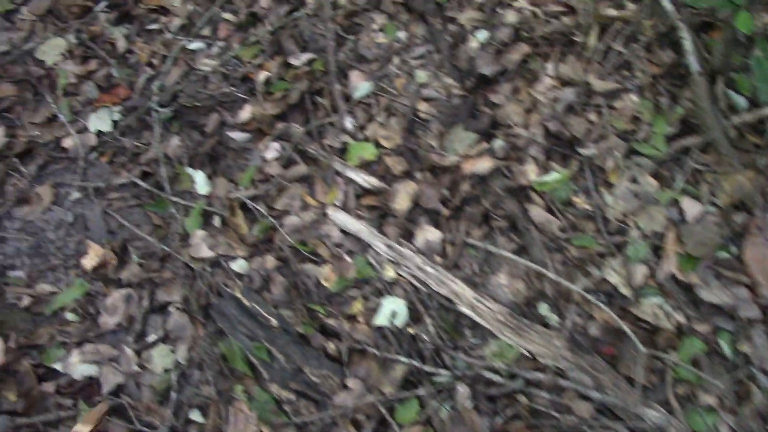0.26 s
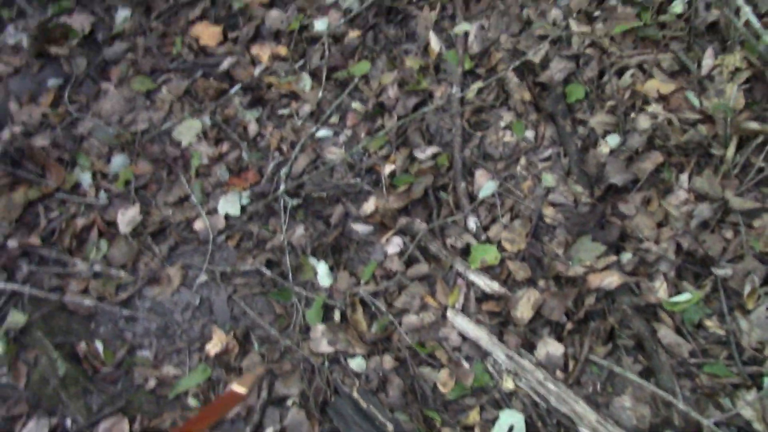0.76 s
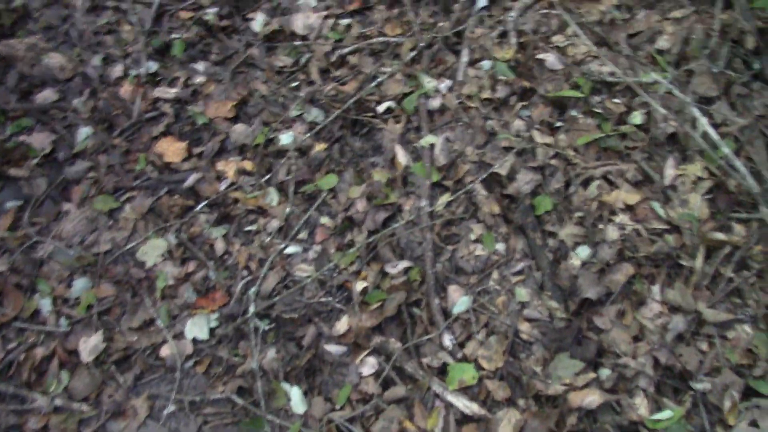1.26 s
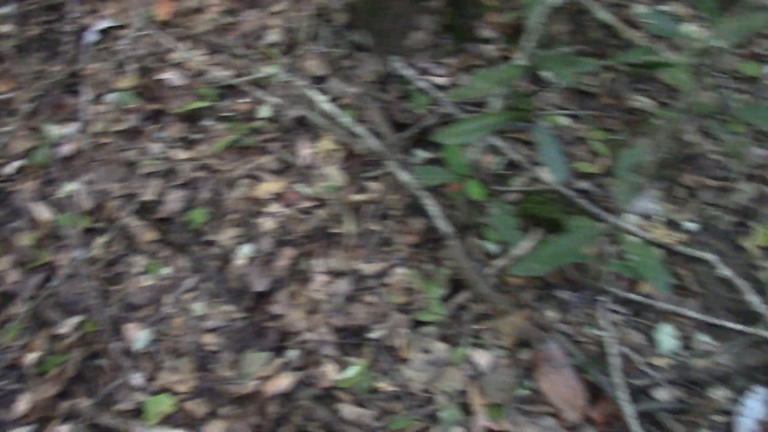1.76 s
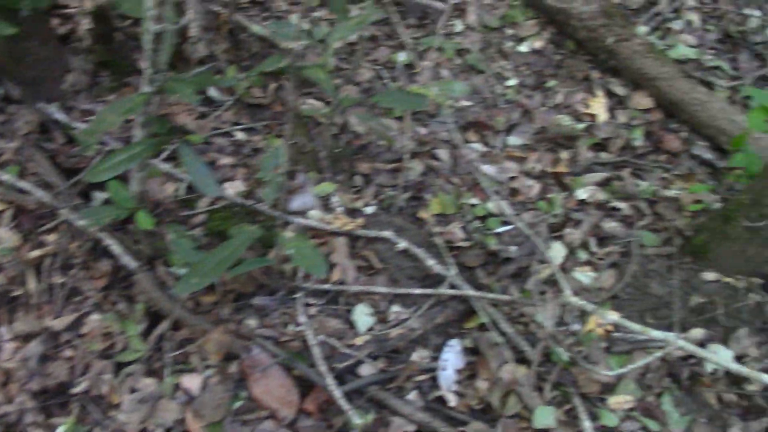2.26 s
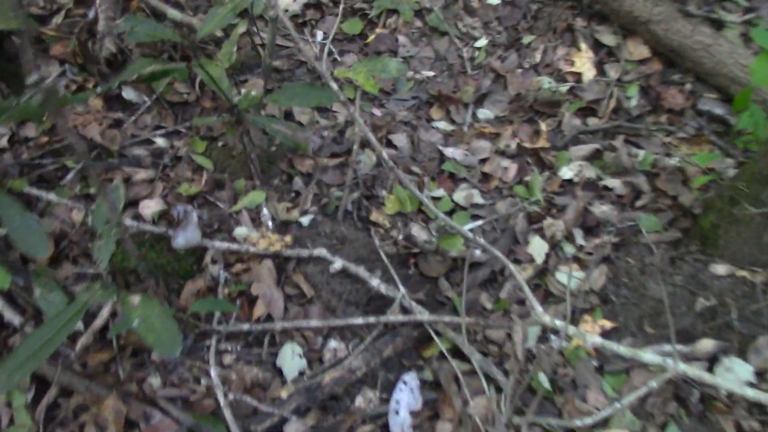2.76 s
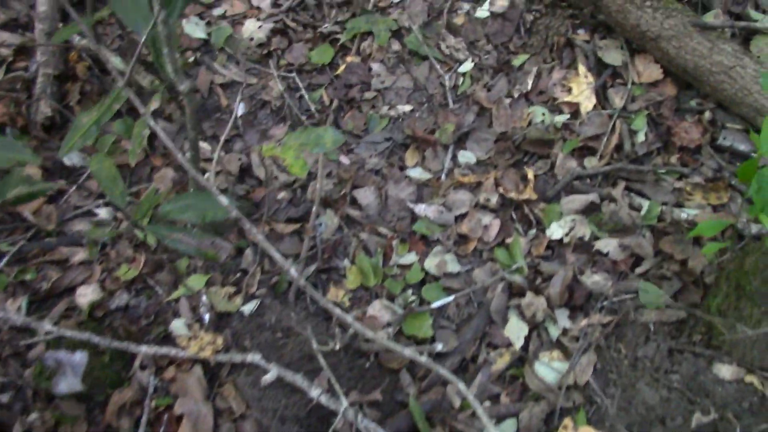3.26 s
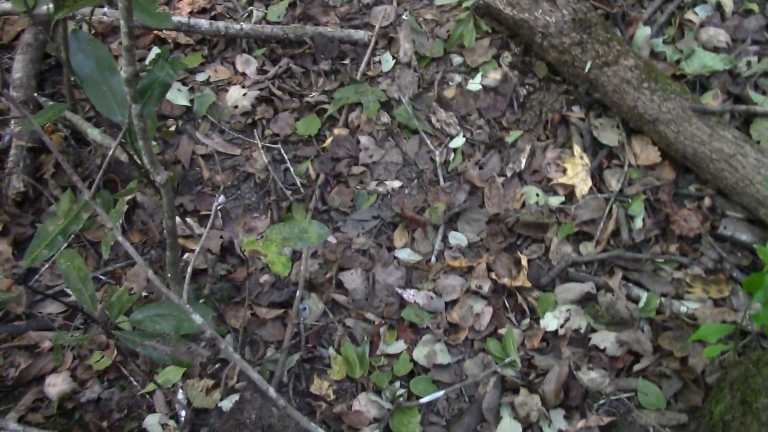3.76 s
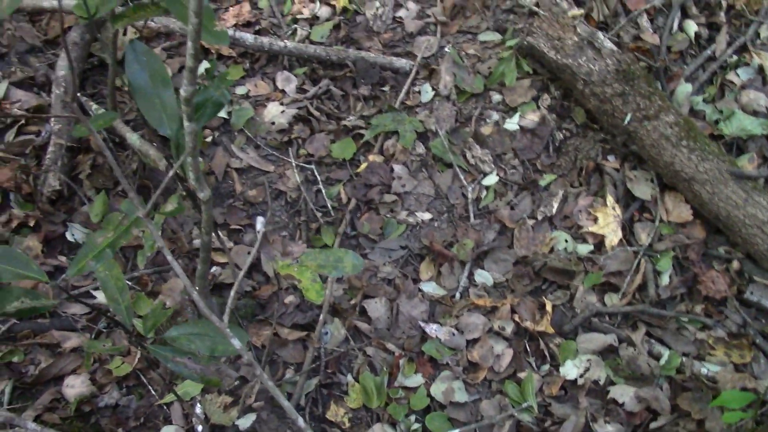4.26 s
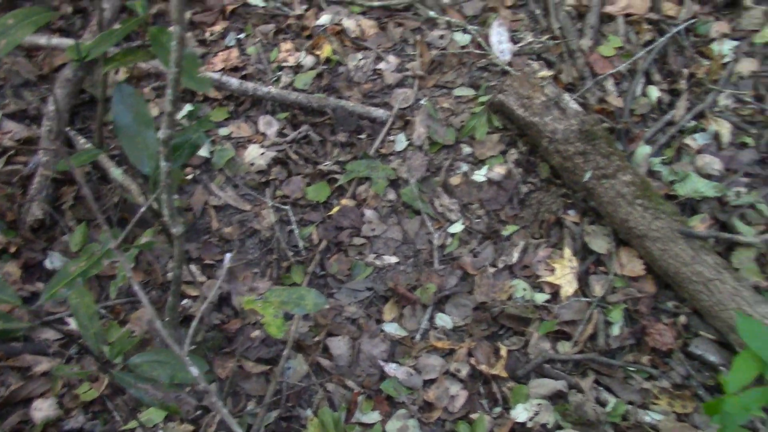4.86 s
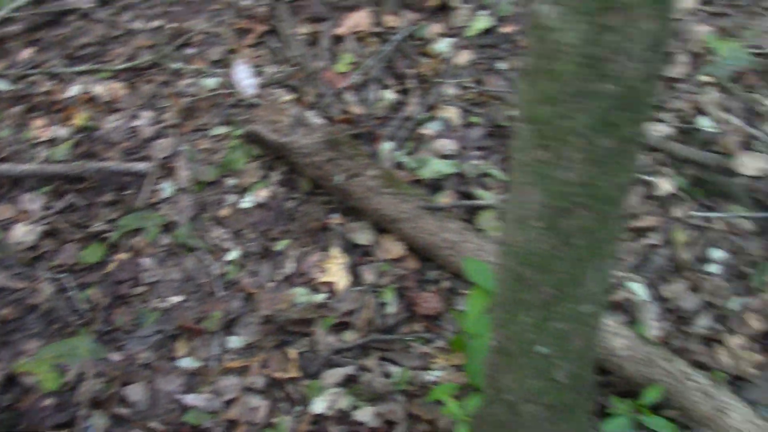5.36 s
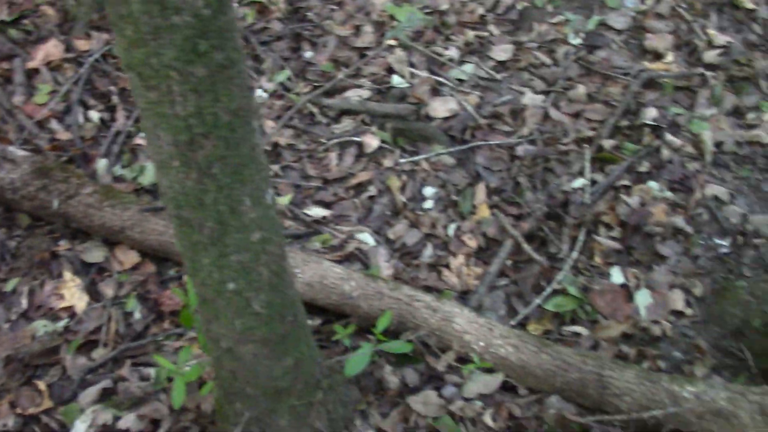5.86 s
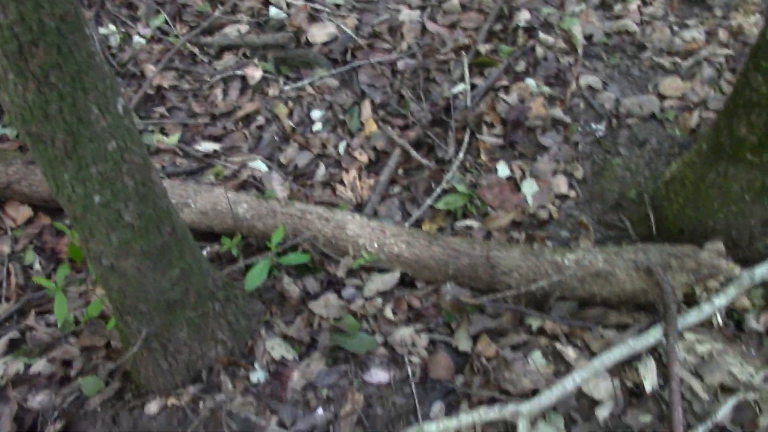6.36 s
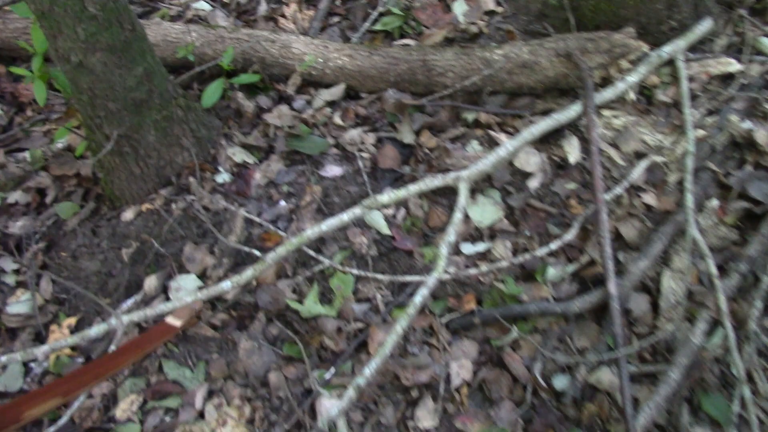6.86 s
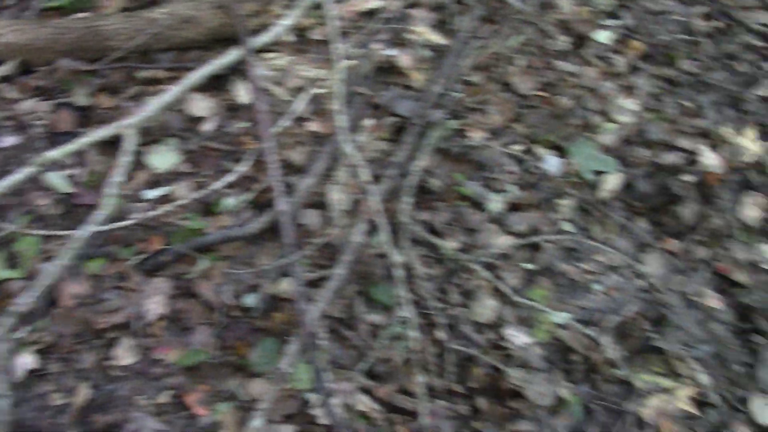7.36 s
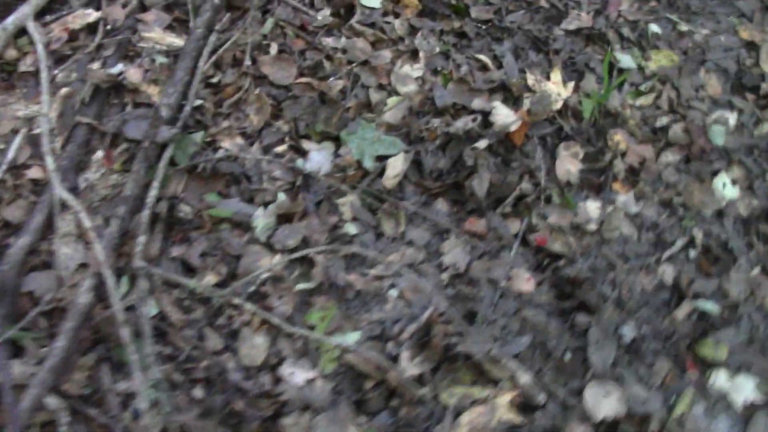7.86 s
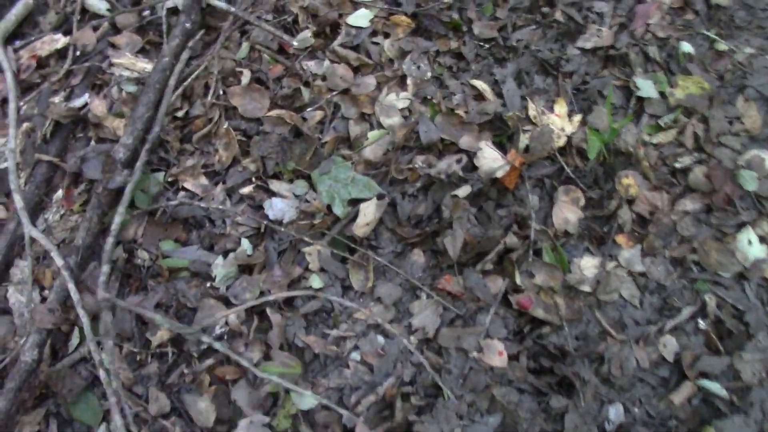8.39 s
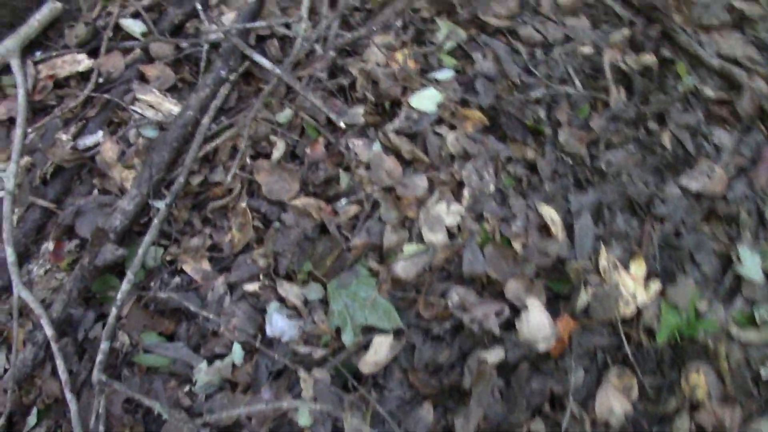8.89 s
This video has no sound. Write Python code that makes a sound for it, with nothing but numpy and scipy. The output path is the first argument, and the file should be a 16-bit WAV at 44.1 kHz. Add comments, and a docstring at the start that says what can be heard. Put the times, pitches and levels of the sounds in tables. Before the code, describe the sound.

In a quiet wood, feet press and drag through brittle leaves right beside the microphone, with sharp twig cracks and short woody knocks. The movement comes in uneven bursts, then nearly ceases for two seconds while a far bird whistles and a nearer one chips twice. Rustling and crunching return, building to denser crackles before easing as the far bird whistles again.

```python
"""Someone walks slowly through dry leaf litter in a quiet, faintly hushing wood, heard from close by.
For about four seconds each step crumples brittle leaves (bursts of tiny breaks), presses the layer below
and snaps twigs (short noise bursts) or knocks buried sticks (damped tones). Then the feet almost rest:
a far bird whistles (wavering tones) and a nearer one chips twice (two gliding voices), 1.7 s apart.
The steps return, and near the end the far bird whistles again."""
import sys
import numpy as np
from scipy import signal
from scipy.fft import rfft, irfft, next_fast_len
from scipy.io import wavfile
from scipy.ndimage import uniform_filter1d, minimum_filter1d, map_coordinates

SR = 44100
rng = np.random.default_rng(int(sys.argv[2]) if len(sys.argv) > 2 else 0)


def transcribe(u):
    """Save the signal u as a 16-bit wav file named by the first command-line argument.

    u: samples, shape (n,) or (channels, n), limited to [-1, 1]; the rate is SR.
    q: integer samples, one column per channel.
    """
    v = np.clip(np.atleast_2d(u).T, -1, 1)
    q = np.round(v * 32767).astype(np.int16)
    wavfile.write(sys.argv[1], SR, q)


N = 402633  # length in samples, about 9.1 s


def amp(db):
    """Decibels to gain."""
    return 10 ** (np.asarray(db) / 20)


def unit(x):
    """Scale x to an rms of 1."""
    return x / np.sqrt(np.mean(x ** 2) + 1e-20)


def along(points, hz):
    """Read a curve of (frequency, value) points on a log frequency axis."""
    f, v = np.transpose(points)
    return np.interp(np.log(hz + 1), np.log(f + 1), v)


def wobble(rate):
    """A smooth random curve through `rate` random values a second."""
    knots = rng.standard_normal(int(N * rate / SR) + 4)
    return map_coordinates(knots, [np.arange(N) * rate / SR])


def add(track, s, sound):
    """Lay a sound into a track at time s, cut off at the track's end."""
    start = max(round(s * SR), 0)
    room = track[..., start:start + sound.shape[-1]]
    room += sound[..., :room.shape[-1]]


def filtered(x, response):
    """Weight the spectrum of x by a response of frequency."""
    m = next_fast_len(N + SR // 4)
    gain = response(np.fft.rfftfreq(m, 1 / SR))
    return irfft(rfft(x, m) * gain, m)[..., :N]


def spread(pair, alike):
    """Mix two unrelated signals into a left and right that are as alike as asked at each frequency."""
    def turn(hz):
        return np.arccos(np.clip(along(alike, hz), -1, 1)) / 2
    mid, side = filtered(pair, lambda hz: np.array([np.cos(turn(hz)), np.sin(turn(hz))]))
    return np.array([mid + side, mid - side])


# Tone of the still woodland air: (frequency [Hz], relative level per Hz [dB])
AIR_COLOUR = [(25, -11), (90, -15), (220, -9.5), (450, -0.5), (700, -2), (1000, -2.5), (1330, -0.5),
              (1800, -4.5), (4500, -7.5), (6200, -18.5), (8500, -17.5), (15000, -31.5)]


def air():
    """The faint hush of the wood: coloured noise whose level drifts slowly."""
    hush = unit(filtered(rng.standard_normal((2, N)), lambda hz: amp(along(AIR_COLOUR, hz))))
    level_db = -59.5 + 0.54 * wobble(1.8)
    return amp(level_db) * hush


# The far bird's whistles: (time [s], length [s], pitch [Hz], level before the mix [dB])
FAR_WHISTLES = [(4.107, 0.056, 3220, -59), (4.164, 0.057, 3320, -62.5), (4.22, 0.089, 2320, -70),
                (8.87, 0.037, 3230, -52), (8.988, 0.069, 3250, -61)]


def whistles():
    """A far bird's thin whistles: pure tones that waver in pitch, swell and fade."""
    out = np.zeros(N)
    for s, length, hz, db in FAR_WHISTLES:
        t = np.arange(int(length * SR)) / SR
        pitch_hz = hz + 65 * wobble(167)[:len(t)]
        phase = 2 * np.pi * np.cumsum(pitch_hz) / SR
        swell = np.sqrt(np.abs(np.sin(np.pi * t / length)))
        add(out, s, amp(db) * swell * np.sin(phase))
    return out


# The near bird's chips: (time [s], level before the mix [dB])
NEAR_CHIPS = [(4.372, -45.5), (6.088, -42.5)]
# The upper voice within one chip: (time from its start [s], pitch [Hz], level relative to the chip [dB])
CHIP_SHAPE = [(0, 5400, -13), (.005, 5660, -6), (.011, 6560, -11), (.017, 7250, -8), (.028, 7570, -11),
              (.038, 7450, -10), (.048, 6570, -13)]


def chips():
    """A near bird's buzzy chips: two voices with jittery pitch, the upper rising and then dropping."""
    out = np.zeros(N)
    when, pitch, level_db = np.transpose(CHIP_SHAPE)
    t = np.arange(int(when[-1] * SR)) / SR
    for s, db in NEAR_CHIPS:
        upper_hz = np.interp(t, when, pitch) + 200 * wobble(528)[:len(t)]
        lower_hz = np.interp(t, when[[0, -1]], [5400, 6600]) + 280 * wobble(450)[:len(t)]
        upper = amp(np.interp(t, when, level_db)) * np.sin(2 * np.pi * np.cumsum(upper_hz) / SR)
        lower = 0.36 * np.sin(np.pi * t / t[-1]) * np.sin(2 * np.pi * np.cumsum(lower_hz) / SR)
        add(out, s, amp(db) * (upper + lower))
    return out


# How long the wood rings: (frequency [Hz], time to fall by 60 dB [s])
WOOD_RING = [(200, 0.39), (3000, 1), (7500, 0.65), (14000, 0.14)]


def among_trees(x):
    """Trunks and crowns scatter a sound into a stereo tail: noise that fades at its own rate per pitch."""
    hz, t, z = signal.stft(rng.standard_normal((2, SR * 3 // 4)), SR, nperseg=256)
    fade = amp(-60 * t / along(WOOD_RING, hz)[:, None])
    tail = signal.istft(z * fade, SR, nperseg=256)[1]
    return signal.fftconvolve(x[None], tail / np.linalg.norm(tail[0]), axes=1)[:, :N]


# Buried sticks and roots that knock under the sole:
# (time [s], level before a 5 dB trim [dB], pitch [Hz], time to fall by 60 dB [s])
BURIED_KNOCKS = [(.316, -26, 263, 0.017), (.352, -23, 1120, 0.018), (1.596, -7, 1390, 0.016),
                 (1.671, -23, 700, 0.018), (2.489, -25, 443, 0.043), (2.551, -23, 440, .035),
                 (2.691, -15, 967, 0.016), (2.809, -17.5, 715, 0.015), (2.874, -10.5, 875, 0.019),
                 (3.334, -26, 800, 0.028), (3.425, -34, 267, .035), (3.754, -25, 1160, 0.017),
                 (4.079, -47, 450, 0.035), (6.332, -31.5, 547, 0.027), (6.352, -33, 366, 0.044),
                 (6.371, -31, 343, 0.027), (6.496, -40, 407, 0.024), (6.668, -34, 480, 0.041),
                 (7.014, -35, 500, 0.037), (7.044, -33, 460, 0.044), (7.081, -18.5, 573, 0.037),
                 (7.16, -34, 490, 0.048), (7.459, -20.5, 1110, 0.014), (7.991, -33.5, 360, 0.11),
                 (7.994, -24, 610, 0.022), (8.388, -29.5, 403, 0.033), (8.419, -25, 840, .03),
                 (8.439, -30, 563, 0.047)]


def knocks():
    """A stick bedded in soil rings in a loose cluster of quickly damped tones."""
    out, t = np.zeros(N), np.arange(SR // 10) / SR
    for s, db, hz, t60 in BURIED_KNOCKS:
        # pitch and fading time vary a little around these multiples of the main tone
        ratios = np.array([[1], [.74], [1.33], [1.9]]) * np.exp(0.032 * rng.standard_normal((4, 1)))
        signs = rng.choice([-1, 1], (4, 1))
        modes = amp([[0], [-6], [-5], [-11]]) * signs * np.sin(2 * np.pi * hz * ratios * t)
        ring = np.sum(modes * amp(-60 * t * np.sqrt(ratios) / t60), axis=0)
        onset = 1 - np.exp(-t / 0.00059)
        add(out, s, amp(db - 5.0) * ring * onset)
    # so small a body radiates no bass
    return signal.sosfilt(signal.butter(3, 230, "high", fs=SR, output="sos"), out)


# Tone of breaking litter: (frequency [Hz], relative level per Hz [dB])
LITTER_COLOUR = [(120, -38), (230, -24), (430, -9.5), (750, -3.5), (1500, -3.5), (2500, 0.5), (4500, -3),
                 (5500, 4), (7000, 1.5), (8100, -5.5), (10100, -5.5), (11500, -13.5), (14200, -14.5),
                 (16500, -34.5)]


def litter_ring(low_hz, high_hz, size=1024, order=5):
    """The litter's short ring to one click, between two frequencies, starting at once; energy 1."""
    hz = np.fft.rfftfreq(size, 1 / SR) + 1
    low_cut = 1 + (low_hz / hz) ** (2 * order)
    high_cut = 1 + (hz / high_hz) ** (2 * order)
    gain = amp(along(LITTER_COLOUR, hz)) / np.sqrt(low_cut * high_cut)
    # folding the cepstrum (spectrum of the log spectrum) forward gives minimum phase
    cepstrum = irfft(np.log(np.maximum(gain, 1e-4)))
    cepstrum[1:size // 2] *= 2
    cepstrum[size // 2 + 1:] = 0
    ring = irfft(np.exp(rfft(cepstrum)))[:size // 2]
    return ring / np.linalg.norm(ring)


# Twigs that break; thin ones are bright and stout ones dull, a clean break is focused, a splintering one not:
# (time [s], level [dB], brightness [dB per octave], focus on the mid-range [dB], decay setting [s])
TWIG_SNAPS = [(.0308, -21.5, -0.5, -7.5, 0.0076), (.0483, -25.5, -2.5, -3.5, 0.015),
              (.144, -24.5, 3, 1, .0035), (.153, -22.5, 1.5, -5, 0.0025), (.2512, -25.5, 0, -4, 0.0084),
              (.3026, -21.5, 0, -9, 0.0038), (.3151, -8.5, 1, 4, 0.0031), (.436, -34, -1, 14, .005),
              (.5645, -29.5, 2.5, -7, 0.0041), (.655, -42.5, -10.5, 4, 0.004),
              (.7229, -36, -7.5, 16, 0.0034), (.9025, -20, 6, -2, 0.014), (.9306, -17.5, -4.5, 14, 0.0043),
              (1.143, -29, -5.5, 7, 0.0023), (1.249, -29.5, 0.5, 0, 0.0045),
              (1.2775, -24.5, -2.5, 13, .003), (1.435, -33.5, 2, -1, 0.0055), (1.4913, -29, 0, 6, .02),
              (1.5407, -21, 3, 1, 0.02), (1.5966, -14, 1.5, -10.5, 0.0037), (1.67, -16, 0.5, -5.5, 0.02),
              (1.6794, -21.5, 0.5, -9.5, 0.015), (1.7136, -15, 0.5, -0.5, 0.0096),
              (1.7805, -19.5, 1.6, -4, 0.011), (1.9242, -32.5, -1, -4, .0025),
              (1.9592, -37, 6.5, -5, .0066), (2.1458, -28.5, -3.5, 14, 0.0019),
              (2.2107, -35, -18.5, 37, 0.0019), (2.4839, -19, 0.5, -5, 0.051),
              (2.4983, -21, 1.5, -2, 0.015), (2.524, -24, 10, 0, 0.011), (2.5462, -3.5, 3, 2, 0.014),
              (2.6644, -24, -1.5, -0.5, .013), (2.6931, -21, -3.5, 5, .015), (2.7604, -22.5, 1, -7, 0.031),
              (2.8074, -10, 1.5, -1, 0.015), (2.8729, -1.5, 2.5, 7, 0.022), (2.9245, -26, 2, -10, .008),
              (3.2613, -20.5, 5, 9, 0.0073), (3.4181, -11, 0, -4, 0.007), (3.4242, -10, 3.5, -2.5, 0.0025),
              (3.4499, -16, 2.5, 1, 0.012), (3.755, -38.5, -5.5, -2, 0.021),
              (4.0713, -35.5, -9.5, 16.5, 0.089), (4.2184, -39, -1, -3.5, 0.037),
              (4.3257, -62.5, 10, -16, .004), (4.8428, -48, 4.5, -4, 0.0053),
              (5.5949, -48, 5.5, -0.5, 0.0092), (5.7633, -46.5, -9, 4.5, 0.015),
              (5.8801, -38.5, -1, 8, 0.022), (6.1745, -41.5, -2, 4, .007), (6.6689, -27.5, -2, 1, 0.009),
              (6.7932, -32.5, -11.5, 15, 0.011), (7.0991, -18.5, -1, 0, 0.019),
              (7.2324, -40, -1, 13, 0.022), (7.3948, -29.5, 1.5, 3, 0.057), (7.422, -36, 0, 6, 0.033),
              (7.5452, -14.5, 2.5, -2.5, 0.023), (7.729, -22, -4, -3.5, 0.028),
              (7.809, -22, -1, -7.5, .011), (7.8459, -21, -2.5, 0, .005), (7.8858, -21, -6.5, 5, .015),
              (8.0948, -14.5, 1.5, 3, 0.0045), (8.1433, -29, -6.5, 8.5, 0.0059),
              (8.2063, -25, -0.5, 4, .004), (8.226, -16, 2, 3, .02), (8.231, -18.5, 0.5, 8, .018),
              (8.267, -20, -0.5, -3, 0.0036), (8.2806, -20, 9.5, 10, 0.0099), (8.3864, -14, 1, -4, 0.0023),
              (8.407, -18, 3, -2, 0.018), (8.6485, -14.5, 1.5, -7, 0.011), (8.787, -25.5, 1, -10, 0.016),
              (8.9075, -24.5, 5, -2, 0.0022), (9.0849, -32, 0.5, 3, 0.018)]
# Share of a snap in its knock, crack, snap and splinter bands: (centre [Hz], level [dB])
SNAP_BANDS = [(900, -9.5), (2800, -4), (5900, -2), (11000, -6.5)]
SNAP_PIVOT_HZ = 4000  # brightness tilts the bands around this
SNAP_VARIES_DB = 0.13  # random level, band to band and twig to twig


def snaps(breaks):
    """A twig parts in one short noise burst; the leaves around it shiver for a moment."""
    out, t = np.zeros((2, N)), np.arange(SR // 25) / SR
    edges_hz = [(25, 1520), (1700, 4400), (4700, 6970), (8500, 11000)]
    rings = [litter_ring(low, high, order=4) for low, high in edges_hz]
    centre_hz, colour_db = np.transpose(SNAP_BANDS)
    outer = np.array([1, 0, 0, 1])  # focus turns down the lowest and highest band
    for s, level_db, brightness, focus_db, decay_s in breaks:
        tilt_db = brightness * np.log2(centre_hz / SNAP_PIVOT_HZ)
        band_db = level_db + colour_db + tilt_db - focus_db * outer
        band_db = band_db + SNAP_VARIES_DB * rng.standard_normal(len(rings))
        crack = amp(-60 * t / (0.66 * decay_s))
        shiver = amp(-18.5 - 60 * t / 0.036)
        bursts = (crack + shiver) * rng.standard_normal((len(rings), 2, len(t)))
        for burst, ring, db in zip(bursts, rings, band_db):
            sound = signal.fftconvolve(burst, ring[None], axes=1)
            # the level is that of the burst's energy packed into one millisecond
            add(out, s, amp(db) * sound * np.sqrt(SR / 1000) / np.linalg.norm(sound, axis=1, keepdims=True))
    return out


# Stalks and stiff leaves tick at random, louder under a moving foot
TICK_DB, TICK_AT_CRACKLE_DB = -31, -38  # mean tick level at this crackle level
TICK_FOLLOWS, TICK_SCATTER_DB = 0.87, 0.5  # dB of tick per dB of crackle, random spread
TICK_BRIGHT_DB, TICK_BRIGHT_SCATTER_DB = 1.5, 3.5  # brightness per octave, random spread
TICK_FOCUS_DB, TICK_DECAY_S = 6.5, 0.0032  # mean focus on the mid-range, median decay setting


def ticks(crackle_db, count=130):
    """Small chance breaks, listed in the same columns as the twigs."""
    when = rng.random(count) * (N - 1)
    size, bright, focus, length = rng.standard_normal((count, 4)).T
    louder_db = TICK_FOLLOWS * (crackle_db[when.astype(int)] - TICK_AT_CRACKLE_DB)
    db = TICK_DB + louder_db + TICK_SCATTER_DB * size
    brightness = TICK_BRIGHT_DB + TICK_BRIGHT_SCATTER_DB * bright
    focus_db = TICK_FOCUS_DB * (1 + focus)
    return list(zip(when / SR, db, brightness, focus_db, TICK_DECAY_S * np.exp(length / 2)))


# A heel, sole or toe presses or drags in the litter:
# (time [s], rise [s], hold [s], crackle control level [dB], weight on the layers below [dB])
FOOT_PRESSES = [(0.0, 0.0028, 0.296, -38.5, 1), (0.3, .012, 0.01, -31.5, 2.5),
                (0.598, 0.012, 0.0077, -44.5, 2.5), (0.73, .04, 0.08, -48, -0.5),
                (0.844, 0.041, .03, -24, 1.5), (1.015, 0.11, 0.16, -43, -4), (1.342, 0.054, 0.27, -49, 2),
                (1.652, .015, 0.014, -40.5, 6.5), (1.757, .015, .015, -42.5, -1),
                (1.824, .06, 0.24, -44, 1.5), (2.048, .06, 0.025, -38.5, 1),
                (2.396, 0.022, 0.045, -55.5, 13), (2.477, 0.028, 0.04, -24, -1.5),
                (2.542, 0.03, 0.13, -32, 0), (2.724, 0.032, 0.073, -31, -0.5),
                (2.865, 0.025, .05, -29.5, -0.5), (3.16, 0.055, 0.027, -44.5, 3.5),
                (3.235, 0.024, .06, -33.5, 0.5), (3.328, 0.043, 0.039, -21, 0.5),
                (3.424, 0.023, .025, -32.5, 3), (3.654, 0.058, 0.18, -57.5, -1),
                (5.644, 0.035, 0.3, -67, 1), (6.195, 0.083, 0.035, -48, 4.5),
                (6.286, 0.046, 0.074, -38.5, 2), (6.464, 0.076, 0.13, -37.5, 0.5),
                (6.636, .04, 0.287, -45, 7), (6.952, 0.036, 0.097, -37, 2.5), (7.096, .02, 0.025, -58, 16),
                (7.456, 0.02, 0.095, -38.5, 4.5), (7.513, 0.024, 0.199, -31, 1),
                (7.71, 0.014, 0.09, -32, 5.5), (7.821, 0.048, 0.16, -35.5, -0.5),
                (8.106, 0.0036, 0.015, -39, 6.5), (8.213, 0.0089, 0.0058, -34, 3.5),
                (8.259, 0.023, 0.048, -27.5, -0.5), (8.337, 0.027, 0.073, -33, 4.5),
                (8.441, 0.067, 0.041, -24.5, 1.8), (8.56, 0.027, 0.037, -29.5, 3.5),
                (8.694, .04, 0.045, -34, -2.5)]
RELEASE_DB_PER_S = 321.5  # the crunch dies as the foot comes to rest
SETTLE_DB, SETTLE_DB_PER_S = -43.5, 41.5  # then the bent leaves creep back
SETTLE_AT_CRACKLE_DB, SETTLE_FOLLOWS = -33.5, 0.63  # a harder press leaves more to settle
SETTLE_WEIGHT_DB = 2.5  # settling leaves sound a little duller
STIR_DB = -65  # leaves under feet that stand still
CRUSH_DB, TREAD_DB = -9, -20  # layer below and soil, relative to the crackle
TREAD_GROWS = 1.4  # dB of tread per dB of weight


def footwork():
    """Each press swells, holds, stops and leaves litter settling: dB curves of crackle, crush and tread."""
    stir = amp([[STIR_DB], [STIR_DB + CRUSH_DB], [STIR_DB + TREAD_DB]])
    power = np.zeros((3, N)) + stir ** 2

    def depth(weight_db):
        return amp([[0], [CRUSH_DB + weight_db], [TREAD_DB + TREAD_GROWS * weight_db]])

    t = np.arange(SR * 3 // 2) / SR
    for s, rise, hold, db, weight_db in FOOT_PRESSES:
        swell = amp(db) * np.minimum(t / rise, 1)
        settle_db = SETTLE_DB + SETTLE_FOLLOWS * (db - SETTLE_AT_CRACKLE_DB)
        resting = np.maximum(t - rise - hold, 0)
        press = depth(weight_db) * amp(-RELEASE_DB_PER_S * resting)
        settle = depth(SETTLE_WEIGHT_DB) * amp(settle_db - db - SETTLE_DB_PER_S * resting)
        add(power, s, (swell * np.maximum(press, settle)) ** 2)
    return 10 * np.log10(power)


def fractures(rate, scatter_db, rub_share):
    """Strength of tiny breaks at random moments, a few large, over the even rub of leaf on leaf."""
    chance = np.clip(rate / SR, 0, 1)
    size = amp(scatter_db * np.minimum(rng.standard_exponential(N), 4))
    happens = rng.random(N) < chance
    power = happens * size ** 2 / np.mean(size ** 2) / chance  # mean power near 1
    # each break tears on for a fraction of a millisecond
    tear = np.exp(-np.arange(SR // 200) / (0.00029 * SR))
    power = np.convolve(power, tear / tear.sum())[:N]
    rub = np.clip(rub_share, 0, 1)
    return np.sqrt(rub + (1 - rub) * power)


def crumple(strength, low_hz, high_hz):
    """Breaks of the given strength, as noise, ring the litter in one band."""
    noise = strength * rng.standard_normal((2, N))
    return signal.oaconvolve(noise, litter_ring(low_hz, high_hz, order=7)[None], axes=1)[:, :N]


def steps(crackle_db, crush_db, tread_db):
    """Pressing the leaves harder breaks more of them a second; they give way in clumps."""
    rate = 90 + 1100 * amp(0.94 * (crackle_db + 31.5))  # breaks a second
    clumps = amp(1.36 * wobble(70))
    # small stiff leaves crack high, the broad damp ones below crack low
    top = clumps * fractures(rate, scatter_db=3.5, rub_share=0.51)
    broad = clumps * fractures(0.65 * rate, scatter_db=4.0, rub_share=0.47)
    under = clumps * fractures(.5 * rate, scatter_db=8.0, rub_share=0.86)
    tips = clumps * fractures(0.48 * rate, scatter_db=5, rub_share=0.38)
    leaves = crumple(amp(crackle_db - 7.5) * np.hypot(top, broad), 2460, 5240)
    leaves += crumple(amp(crackle_db - 4.5) * top, 5630, 7000)
    leaves += crumple(amp(crackle_db - 9.5) * np.hypot(top, tips), 7880, 17000)
    layer = crumple(amp(crush_db - 3.5) * np.hypot(under, broad), 680, 2553)
    # the soil gives way in coarser lumps
    lumps = amp(2.3 * wobble(80))
    soil = crumple(amp(tread_db - 3.0) * lumps * np.hypot(under, 1), 110, 737)
    return leaves + layer + soil


# How alike left and right are for the near feet: (frequency [Hz], likeness [0 to 1])
FEET_ALIKE = [(60, 1), (400, 1), (1100, 1), (1700, 0.9), (3000, 0.91), (6200, 0.88), (8200, 0.45),
              (14000, 0.74)]
# How alike left and right are for the wood all around: (frequency [Hz], likeness [0 to 1])
WOOD_ALIKE = [(60, 0.042), (800, 0), (1400, 0.029), (6000, 0.18), (9000, .2)]


def scene():
    """Close feet a little to the left, birds in the middle, air and echoes from all around."""
    crackle_db, crush_db, tread_db = footwork()
    breaks = list(TWIG_SNAPS) + ticks(crackle_db)
    feet = steps(crackle_db, crush_db, tread_db) + snaps(breaks)
    song = chips() + whistles()
    near = (spread(feet, FEET_ALIKE) + knocks()) * amp([[.75], [-.75]])
    echo = amp(-20.0) * among_trees(feet[0]) + amp(3.5) * among_trees(song)
    return near + amp(3.5) * song + spread(air() + echo, WOOD_ALIKE)


LOPSIDED = .022  # slight lopsided overload: the loudest snaps gain a faint low thump
TOP_HZ = 16300  # nothing is kept from here up


def record(dry):
    """A fast limiter holds peaks near full scale; a slight lopsided overload and a treble cut follow."""
    needed = 1 / np.maximum(np.abs(dry).max(axis=0), 1)
    held = dry * uniform_filter1d(minimum_filter1d(needed, size=33), size=33)
    return filtered(held + LOPSIDED * held ** 2, lambda hz: hz < TOP_HZ)


dry = scene()
out = record(dry)
transcribe(out)
```